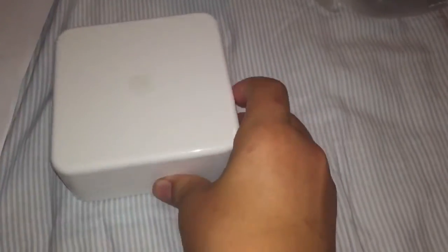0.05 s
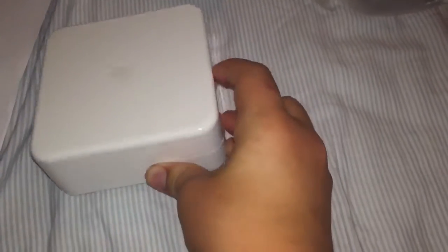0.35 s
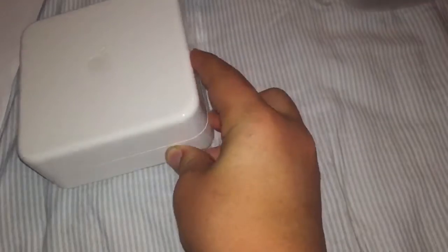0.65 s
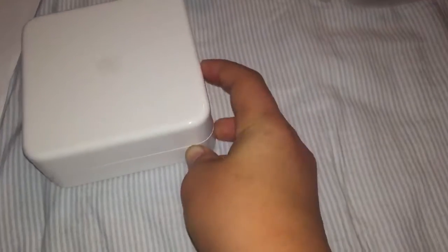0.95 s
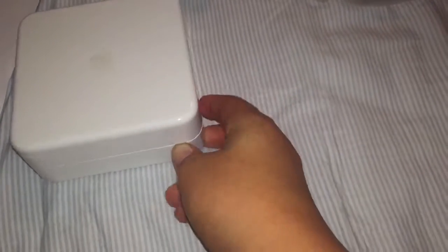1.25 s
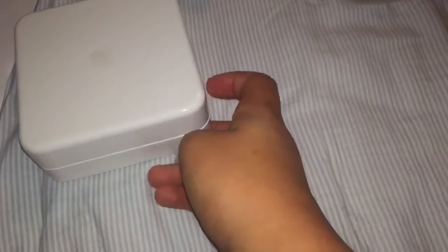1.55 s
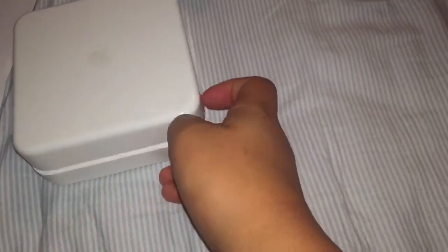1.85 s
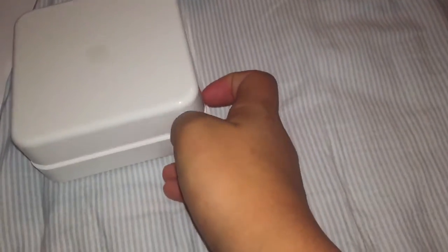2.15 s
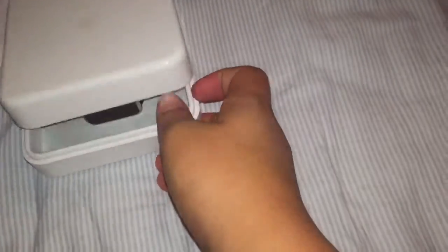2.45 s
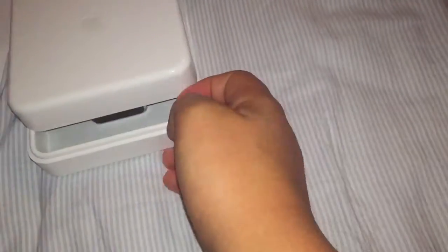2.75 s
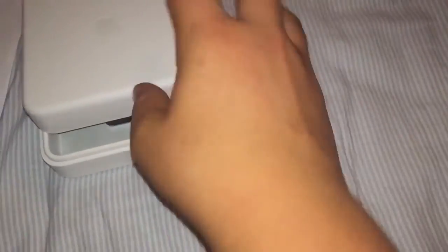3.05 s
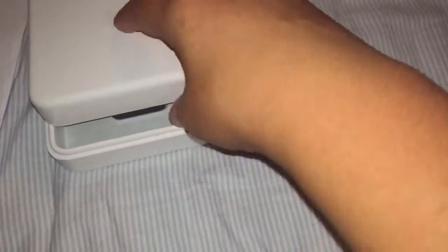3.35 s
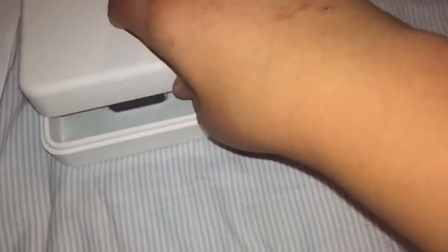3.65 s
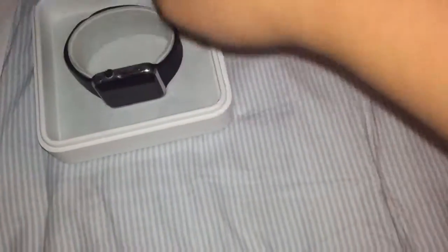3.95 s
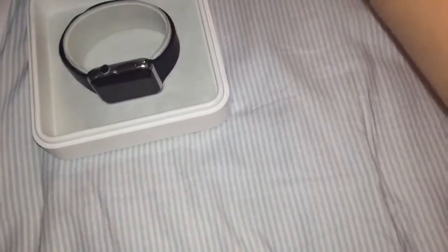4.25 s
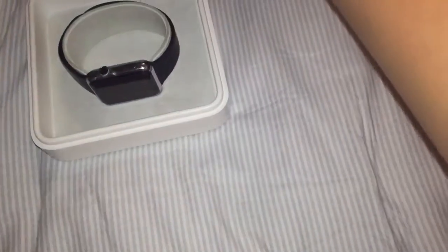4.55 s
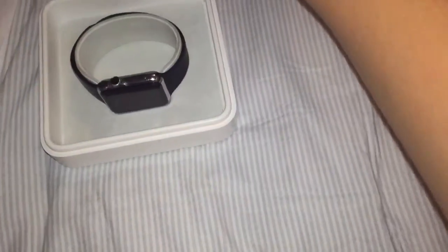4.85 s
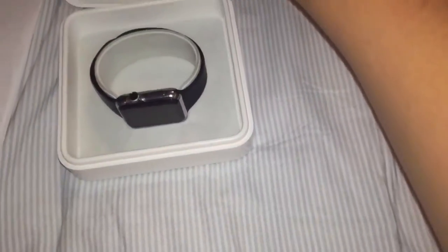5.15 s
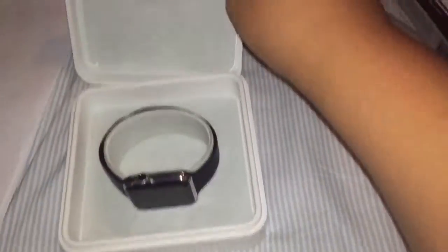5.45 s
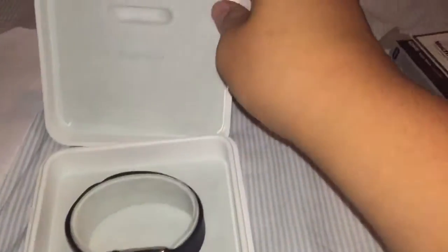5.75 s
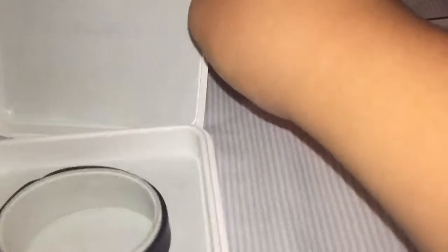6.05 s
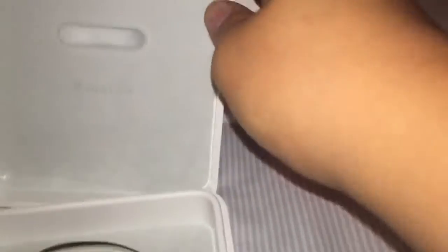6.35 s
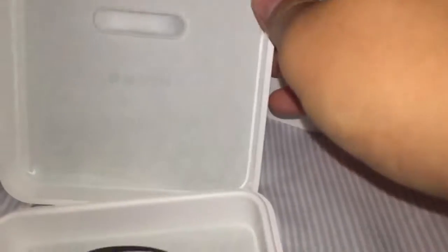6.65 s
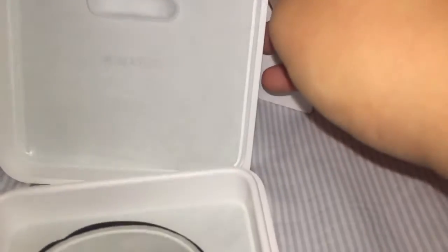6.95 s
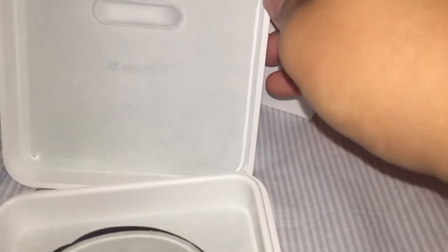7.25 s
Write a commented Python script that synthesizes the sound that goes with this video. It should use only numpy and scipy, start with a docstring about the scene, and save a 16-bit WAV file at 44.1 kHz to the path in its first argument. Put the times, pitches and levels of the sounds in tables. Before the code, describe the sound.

A hard plastic case is handled on a bed, close to the microphone, in a small room where a fan hums faintly and swishes about five times a second throughout. Light fingernail clicks come at 0.2 and 0.8 seconds, followed by soft finger thuds and thin ticks between 1.2 and 2.2 seconds. At about 2.4 seconds the catch gives a short creak, plastic scrapes and knocks at the seam, and at 2.55 the lid snaps free with one sharp crack, by far the loudest sound. A palm brushes faintly over the lid from 3 to 4 seconds, with a brief low fingertip judder near 3.8. Around 4.3 to 4.6 seconds the hinge scrapes, ticks and squeaks slightly. Two small knocks follow near 4.8 and a light click at 5.4. Then only the fan remains, with one very soft finger thud at 7.2 seconds.

```python
"""A hard plastic case is shifted on a bed and prised at the seam until its lid snaps free and folds back.
Each knock rings the shell, rocks the case on the mattress and ticks at the edge. The catch creaks
just before it gives, and the hinge scrapes and ticks. Fingers tap, rub and judder on the plastic.
Behind it, in the small room, a fan hums and swishes once a turn."""
import sys
import numpy as np
from scipy import signal
from scipy.fft import rfft, irfft, next_fast_len
from scipy.io import wavfile

SR = 44100
rng = np.random.default_rng(int(sys.argv[2]) if len(sys.argv) > 2 else 0)


def inscribe(sig):
    """Save sig as 16-bit PCM at rate SR to the path in sys.argv[1].

    A 1-D sig is mono; a 2-D sig holds one channel per row.
    Samples are clipped to [-1, 1] before scaling.
    """
    pcm = np.round(np.clip(np.atleast_2d(sig).T, -1, 1) * 32767)
    wavfile.write(sys.argv[1], SR, pcm.astype(np.int16))


N = 331279

# A mode is one tone that a struck thing rings with; its ring time is how long it takes to fade by 60 dB.
# the tones of the plastic shell: pitch_hz, level_db, ring_s
SHELL_MODES = [(424.6, -4, 0.033), (527, 2.5, 0.015), (650, -4, 0.047), (866.4, -1.5, 0.025),
               (1114.5, -0.5, 0.027), (1490, -1.5, 0.02), (1780, -3, 0.014), (2300, -13, .02),
               (2710, -13, .018), (3540, -9, .023), (4660, -27.5, 0.022), (5970, -23, 0.024),
               (6760, -24.5, .012)]
# the low tones of the whole case rocking on the mattress: pitch_hz, level_db, ring_s
ROCKING_MODES = [(105.84, -6, 0.023), (179, -2.5, .04), (296, 2.5, 0.026), (432, -1, 0.037)]
# how strong an edge tick is from low to high: pitch_hz, level_db
TICK_COLOUR = [(1500, -15.5), (3000, 0.5), (4100, -4), (5900, -3), (8000, -8.5), (10300, -10.5),
               (11700, -7.5), (15500, -17.5)]
TOUCH_SPREAD_DB = 1.5   # how much each tone varies from touch to touch
FLESH_LAG = 6.2   # the flesh of a finger presses this many times longer than its first touch


def from_db(db):
    """Turn decibels into a number to multiply by."""
    return 10 ** (np.asarray(db) / 20)


def rms_one(x):
    """Scale a sound so its average strength (rms) is 1."""
    return x / np.sqrt(np.mean(x ** 2) + 1e-20)


def peak_one(x):
    """Scale a sound so its highest peak is 1."""
    return x / (np.abs(x).max() + 1e-20)


def seconds(length=None):
    """The time of each sample in the scene, or in a shorter sound."""
    return np.arange(N if length is None else int(length * SR)) / SR


def add(out, start_s, sound):
    """Mix a sound in at a given time."""
    start = int(round(start_s * SR))
    out[start:start + len(sound)] += sound[:N - start]


def high_pass(x, hz, order):
    """Turn down what lies below hz."""
    return signal.sosfilt(signal.butter(order, hz, "high", fs=SR, output="sos"), x)


def coloured(x, colour):
    """Shape a noise to follow (pitch_hz, level_db) points, at average strength 1."""
    hz, db = np.transpose(colour)
    size = next_fast_len(len(x))
    bins_hz = np.maximum(np.fft.rfftfreq(size, 1 / SR), 1)
    gain = from_db(np.interp(np.log(bins_hz), np.log(hz), db))
    return rms_one(irfft(rfft(x, size) * gain, size)[:len(x)])


def drift(per_s):
    """A random wander of about 1 either way, with per_s new values a second."""
    points = rng.standard_normal(N // 20)
    return np.interp(seconds() * per_s, np.arange(len(points)), points)


def grains(per_s, spread_db):
    """Tiny slips of uneven size at random moments."""
    slipping = rng.random(N) < per_s / SR
    return slipping * rng.standard_normal(N) * from_db(spread_db * rng.standard_normal(N))


def swell(peak_s, rise_s, fall_s, depth_db=20):
    """One hand movement grows by depth_db in the rise time and fades as much in the fall time."""
    t = seconds() - peak_s
    from_peak = np.maximum(-t / rise_s, t / fall_s)
    return from_db(-depth_db * np.minimum(from_peak, 10))


def struck(modes, spread_db=0, contact_ms=0):
    """A thing rings after one blow; the longer the contact, the weaker its high tones."""
    t = seconds(.12)
    hz, db, ring_s = np.transpose(modes)[:, :, None]
    softness = np.exp(-(hz * contact_ms / 1000) ** 2)
    direction = (-1) ** np.arange(len(hz))[:, None]   # neighbouring modes swing opposite ways
    strength = softness * from_db(db + spread_db * rng.standard_normal(db.shape)) * direction
    tones = strength * from_db(-60 * t / ring_s) * np.sin(2 * np.pi * hz * t)
    return peak_one(tones.sum(axis=0))


def tick(ring_s=0.025):
    """A hard edge has so many high, short tones that they blur into a burst of noise."""
    t = seconds(.12)
    return peak_one(coloured(rng.standard_normal(len(t)), TICK_COLOUR) * from_db(-60 * t / ring_s))


def fan(air_db=-64, swish_db=-67.5, swish_depth_db=13.5, waver_db=1.0):
    """The motor hums, air rushes steadily, and each turn brings a swish and a faint chirp."""
    # the motor's tones: pitch_hz, level_db
    hum_tones = [(119.5, -76), (240, -83), (360.2, -67.5)]
    # how far the fan has turned: time_s, turns_made
    turn_counts = [(-.111, 0), (2.962, 17), (4.76, 27), (7.618, 43)]
    # the colour of the swish: pitch_hz, level_db
    swish_colour = [(400, -4), (1100, 2.5), (1400, -1.5), (2200, 0.5), (3500, -2.5), (5300, -9.5),
                    (6000, -0.5), (6700, -7.5), (8400, -8.5), (10000, -14.5), (15000, -19.5)]
    # the chirp's tones: pitch_hz, level_db
    chirp_tones = [(1040, -78), (6050, -83.5)]
    # the colour of the rushing air: pitch_hz, level_db
    air_colour = [(25, -36), (45, -8.5), (70, -5.5), (113, -2), (150, -9), (220, -14), (330, -16),
                  (450, -22.5), (730, -26), (1640, -27.5), (6000, -34), (9500, -36), (10500, -41),
                  (11700, -37), (15800, -40.5)]
    t = seconds()
    hum = sum(from_db(db + waver_db * drift(2)) * rms_one(np.sin(2 * np.pi * (hz * t + rng.random())))
              for hz, db in hum_tones)
    turn = np.interp(t, *np.transpose(turn_counts)) % 1
    rise_turns, hold_turns, fall_turns = 0.027, 0.14, 0.25
    faded = np.interp(turn, np.cumsum([0, rise_turns, hold_turns, fall_turns]), [1, 0, 0, 1])
    swish = from_db(swish_db - swish_depth_db * faded) * coloured(rng.standard_normal(N), swish_colour)
    bend = 1 + .04 * drift(6) + .025 * drift(900)   # the chirp's pitch wanders slowly and shakes fast
    bent_time = np.cumsum(bend) / SR
    chirp = sum(from_db(db + waver_db * drift(12)) * rms_one(np.sin(2 * np.pi * hz * bent_time))
                for hz, db in chirp_tones)
    air = from_db(air_db) * coloured(rng.standard_normal(N), air_colour)
    return hum + swish + (1 - faded) ** 2 * chirp + air


def room(x, first_echo_s=0.0041, early_ring_s=0.1, ping_hz=3490):
    """Sound bounces quickly off nearby things, then leaves a faint tail that dies band by band."""
    # the room's echoes from low to high: pitch_hz, early_db, late_db, late_ring_s
    echo_bands = [(150, -15, -26, .3), (500, -14.5, -25, 0.34), (1200, -14, -20.5, 0.31),
                  (3000, -15, -15.5, .33), (6994, -15.5, -18.5, .27), (13953, -16.5, -22.5, .2)]
    t, echo = seconds(.5), 0
    hz, *columns = np.transpose(echo_bands)
    edges_hz = np.geomspace(70, 17000, 9)
    for low, high in zip(edges_hz, edges_hz[1:]):
        middle = np.log(low * high) / 2
        early_db, late_db, late_ring_s = [np.interp(middle, np.log(hz), c) for c in columns]
        band = signal.butter(2, [low, high], "band", fs=SR, output="sos")
        band_share = np.sqrt((high - low) / (SR / 2) / len(t))
        for db, ring_s in ((early_db, early_ring_s), (late_db, late_ring_s)):
            tail = signal.sosfilt(band, rng.standard_normal(len(t)) * from_db(-60 * t / ring_s))
            echo = echo + from_db(db) * band_share * rms_one(tail)
    # the shell's high ping is heard only close by, so it is cut from the echo
    echo = signal.lfilter(*signal.iirnotch(ping_hz, 9, fs=SR), echo)
    out = np.zeros(N)
    add(out, first_echo_s, signal.fftconvolve(x, echo)[:N])
    return out


def palm():
    """Dry skin gives a fine, bright hiss with each stroke."""
    # strokes of the palm over the lid: peak_s, rise_s, fall_s, level_db
    strokes = [(3.16, .11, 0.28, -61), (3.62, 0.25, 0.4, -66), (4.1, .3, 0.28, -74)]
    # the colour of brushing skin: pitch_hz, level_db
    brush_colour = [(700, -15), (1500, -4), (2400, -3), (3300, 1), (4300, 2), (5300, -0.5), (6500, 0),
                    (8000, -2.5), (10500, -5), (15000, -9.5)]
    pressure = sum(from_db(db) * swell(peak_s, rise_s, fall_s) for peak_s, rise_s, fall_s, db in strokes)
    return pressure * coloured(grains(9000, spread_db=1.5), brush_colour)


def squeaks(ring_s=0.029):
    """Rubbing keeps one tone ringing for a moment, giving a rough whistle."""
    # brief squeaks of skin and hinge: peak_s, width_s, pitch_hz, level_db
    whistles = [(3.603, 0.021, 5200, -68), (4.555, 0.0094, 993, -54.5), (4.556, 0.0114, 2630, -62)]
    out = np.zeros(N)
    for peak_s, width_s, hz, db in whistles:
        whistle = rms_one(signal.fftconvolve(rng.standard_normal(N), struck([(hz, 0, ring_s)]))[:N])
        out += from_db(db) * whistle * np.exp(-.5 * ((seconds() - peak_s) / width_s) ** 2)
    return out


def judder(start_s=3.79, level_db=-54, flutter_db=6.0, start_hz=317.8, sag_octaves_per_s=6.7):
    """A fingertip sticks and slips ever more slowly as the lid tips over."""
    t = seconds() - start_s
    rise_s, hold_s, fall_s = 0.03, 0.143, 0.015
    corners_s = np.cumsum([0, rise_s, hold_s, fall_s])
    slips_per_s = start_hz * 2 ** (-sag_octaves_per_s * np.clip(t, 0, corners_s[-1]))
    phase = 2 * np.pi * np.cumsum(slips_per_s * (1 + .08 * drift(200))) / SR
    loudness = np.interp(t, corners_s, [0, 1, 1, 0]) * from_db(level_db + flutter_db * drift(120))
    return loudness * rms_one(np.sin(phase))


def sliding():
    """Plastic rubs on plastic: tiny slips grind through the shell, shake the case and hiss at the edge."""
    # rubs at the seam, then at the hinge: peak_s, rise_s, fall_s, grind_db, hiss_db, rumble_db
    rubs = [(2.423, 0.012, .035, -42, -63.5, -70), (2.468, .025, 0.17, -56, -59, -48.5),
            (2.53, 0.043, 0.052, -46.5, -56.5, -38.5), (2.91, .1, .12, -64, -73.5, -67),
            (3.875, 0.062, 0.15, -60.5, -75.5, -54), (4.407, 0.033, 0.034, -49, -59, -47.5),
            (4.456, .025, 0.034, -58.5, -52, -51.5), (4.55, 0.11, 0.18, -76.5, -65.5, -79),
            (4.8, 0.075, .4, -74, -82, -76)]
    slips = grains(3000, spread_db=2)
    grind = rms_one(signal.fftconvolve(slips, struck(SHELL_MODES, contact_ms=.34))[:N])
    rumble = rms_one(signal.fftconvolve(slips, struck(ROCKING_MODES, contact_ms=2.4))[:N])
    hiss = coloured(grains(9000, spread_db=2.5), TICK_COLOUR)
    out = np.zeros(N)
    for peak_s, rise_s, fall_s, grind_db, hiss_db, rumble_db in rubs:
        rub = from_db(grind_db) * grind + from_db(hiss_db) * hiss + from_db(rumble_db) * rumble
        out += swell(peak_s, rise_s, fall_s) * rub
    return out


def finger_pads(contact_ms=0.94, ring_below_thud_db=24):
    """Flesh lands softly: it rocks the case and barely rings the shell."""
    # fingers landing on the case: start_s, level_db
    landings = [(1.212, -44.5), (1.436, -40), (1.803, -50.5), (2.222, -43.5), (4.325, -47), (7.194, -53)]
    out = np.zeros(N)
    for start_s, db in landings:
        thud = struck(ROCKING_MODES, TOUCH_SPREAD_DB, contact_ms * FLESH_LAG)
        ring = from_db(-ring_below_thud_db) * struck(SHELL_MODES, TOUCH_SPREAD_DB, contact_ms)
        add(out, start_s, from_db(db) * (thud + ring))
    return out


def rim_pings():
    """The lid's stiff rim gives a thin ping as it shifts against the base."""
    # shifts under the fingers: start_s, ring_db, tick_db
    shifts = [(.667, -50.5, -53), (1.29, -43.5, -53.5)]
    # the tones of the rim: pitch_hz, level_db, ring_s
    rim_modes = [(723, -5, 0.046), (1130, 2.5, 0.037), (3260, -0.5, 0.021)]
    out = np.zeros(N)
    for start_s, ring_db, tick_db in shifts:
        ring = from_db(ring_db) * struck(rim_modes, TOUCH_SPREAD_DB)
        add(out, start_s, ring + from_db(tick_db) * tick())
    return out


def nail_clicks(bass_cut_hz=660):
    """A light, hard tap ticks and rings only the lid panel, which is too small to give off bass."""
    # nails and hard edges on the lid: start_s, ring_db, tick_db, contact_ms
    taps = [(0.1947, -31.5, -58, 0.3), (0.7719, -27, -42, 0.056), (5.3652, -41.5, -57, 0.13)]
    # the tones of the flat lid panel: pitch_hz, level_db, ring_s
    panel_modes = [(805, -4, 0.005), (1134, 3.5, 0.019), (1434, -0.5, 0.022), (1797, -1, 0.017),
                   (2330, -3, .012), (2700, -7, 0.013), (3480, -11, 0.017)]
    out = np.zeros(N)
    for start_s, ring_db, tick_db, contact_ms in taps:
        panel = struck(panel_modes, TOUCH_SPREAD_DB, contact_ms)
        ring = peak_one(high_pass(panel, bass_cut_hz, order=4))
        add(out, start_s, from_db(ring_db) * ring + from_db(tick_db) * tick())
    return out


def catch_creak():
    """The catch sticks and slips just before it gives, and each slip rings the shut case."""
    # a quick run of slips: start_s, level_db
    slips = [(2.4355, -29), (2.4402, -20.5), (2.4436, -15.5), (2.4490, -22.5), (2.4545, -31)]
    # the tones of the shut case, with air trapped inside: pitch_hz, level_db, ring_s
    shut_modes = [(440.6, 2, .05), (620, 0, 0.03), (775, -5.5, .025), (895, -5, .04), (1200, -12.5, .03),
                  (1556, -1, .03), (2060, -10, .015), (2570, -12.5, 0.013)]
    out = np.zeros(N)
    for start_s, db in slips:
        add(out, start_s, from_db(db) * struck(shut_modes, TOUCH_SPREAD_DB, contact_ms=.2))
    return out


def blows(rows, spread_db):
    """Each blow rings the shell, rocks the case and ticks where it lands."""
    out = np.zeros(N)
    for start_s, ring_db, thud_db, tick_db, contact_ms in rows:
        ring = from_db(ring_db) * struck(SHELL_MODES, spread_db, contact_ms)
        thud = from_db(thud_db) * struck(ROCKING_MODES, spread_db, contact_ms * FLESH_LAG)
        add(out, start_s, ring + thud + from_db(tick_db) * tick())
    return out


def knocks():
    """Handling knocks the case and jolts its catch and hinge."""
    # hard contacts: start_s, ring_db, thud_db, tick_db, contact_ms
    contacts = [(.1962, -36.5, -31, -68, 0.28), (1.292, -65, -30.5, -70, 0.79),
                (1.5475, -65, -69, -53.5, .3), (2.012, -55.5, -48.5, -75, 0.44),
                (2.4992, -18, -24, -46, 0.27), (2.5072, -19.5, -27.5, -59, .34),
                (3.245, -55, -60, -74.5, .9), (4.3905, -39, -32.5, -56.5, .7), (4.463, -34, -43.5, -42, .1),
                (4.5187, -60, -68.5, -43, 0.055), (4.527, -61.5, -70, -55, 0.053),
                (4.804, -46, -52, -65.5, 0.3), (4.847, -46.5, -59, -67.5, 0.23),
                (5.3654, -45.5, -63, -54, .1)]
    return blows(contacts, TOUCH_SPREAD_DB)


def lid_snap():
    """The lid jumps off its catch: two blows so close that they make one crack."""
    # the two blows: start_s, ring_db, thud_db, tick_db, contact_ms
    snap_blows = [(2.5554, -22, -38, -18.5, 0.073), (2.5559, 1, -17, -24.5, .15)]
    return blows(snap_blows, spread_db=0)


def scene():
    """The case close by, its echo in the room, and the fan behind."""
    hits = knocks() + lid_snap() + finger_pads() + nail_clicks() + rim_pings()
    case = hits + catch_creak() + sliding() + palm() + judder() + squeaks()
    return (case + room(case) + fan())[None]


def record(dry, ceiling=.92, top_hz=15800):
    """The microphone drops the deep bass, the highest peaks are rounded, and the top is cut steeply."""
    thinned = high_pass(dry, 58, order=2)
    rounded = thinned / (1 + (thinned / ceiling) ** 6) ** (1 / 6)
    return signal.sosfilt(signal.ellip(12, .1, 80, top_hz, fs=SR, output="sos"), rounded)


dry = scene()
out = record(dry)
inscribe(out)
```